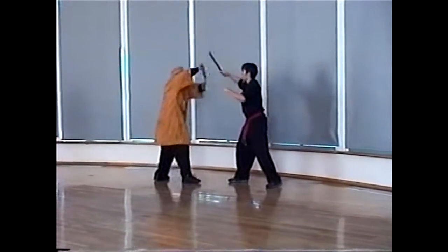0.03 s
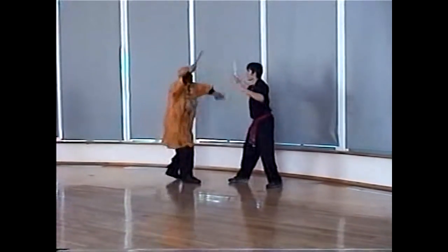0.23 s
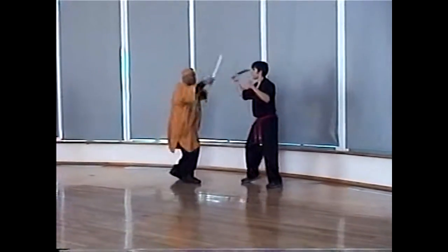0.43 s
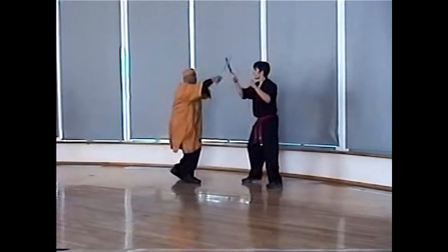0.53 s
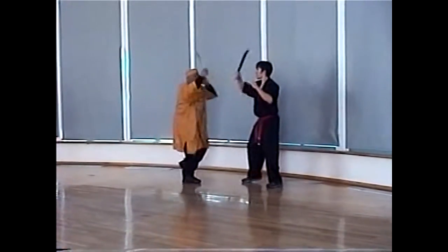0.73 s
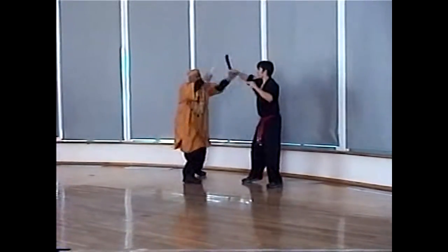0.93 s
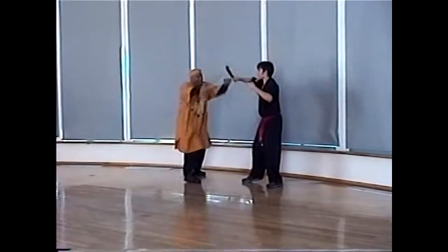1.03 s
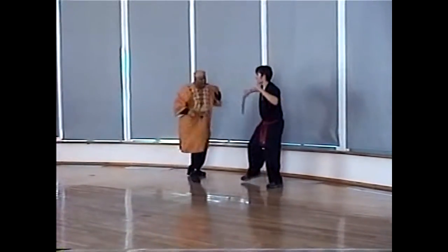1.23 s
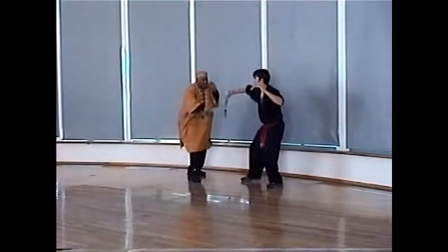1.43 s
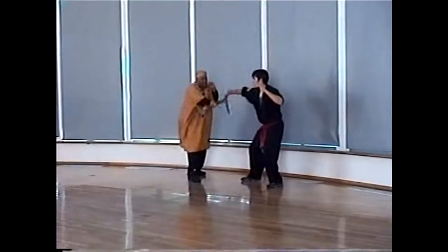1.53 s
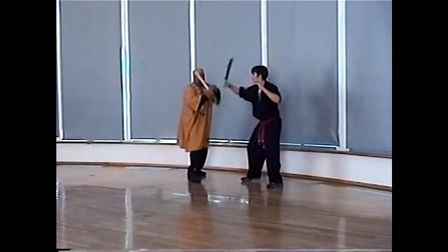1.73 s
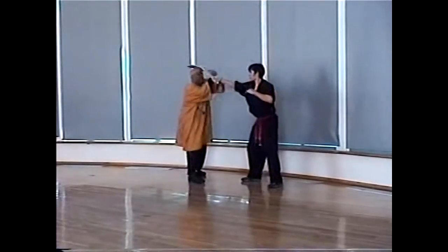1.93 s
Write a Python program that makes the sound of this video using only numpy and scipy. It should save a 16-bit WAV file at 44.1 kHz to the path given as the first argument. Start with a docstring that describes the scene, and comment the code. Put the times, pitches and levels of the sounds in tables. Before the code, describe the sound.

Machete blades strike together in four quick, evenly spaced clacks that ring on and echo around a large hall. A nearby microphone also catches feet softly thudding and scuffing on wooden boards over a low room rumble.

```python
"""Two people spar with machetes in a large hall with a wooden floor and a curved wall.
We open on low room rumble and the ring-out of a clash just gone; feet thud softly on the boards.
From 0.2 s come four clashes, a little under half a second apart, each a short chatter of steel on steel.
After each hit the wall throws it back into a long tail and both blades ring on, smeared in pitch
as they swing. Two last footfalls land under the final decay."""
import sys
import numpy as np
from scipy import signal
from scipy.fft import rfft, irfft
from scipy.io import wavfile
from scipy.ndimage import uniform_filter1d

SR = 44100
rng = np.random.default_rng(int(sys.argv[2]) if len(sys.argv) > 2 else 0)


def waveform_to_disk(signal):
    """Save audio, clipped to [-1, 1], as 16-bit WAV at the path in sys.argv[1]."""
    frames = np.transpose(np.atleast_2d(signal))
    scaled = np.clip(frames, -1, 1) * 32767
    samples = np.round(scaled).astype(np.int16)
    wavfile.write(sys.argv[1], SR, samples)


N = 88200

# Room rumble EQ: f/Hz, level/dB
RUMBLE_EQ = [(20, -4.5), (45, -7.5), (70, -0.5), (100, -7.5), (130, 2.5), (170, -5), (260, -5),
             (420, -12.5), (1000, -20.5), (3000, -25.5), (7000, -30), (11000, -43), (16000, -43.5)]
# Clash cues: t/s, chatter/dB, contact length/s, tilt/(dB per octave), knock/dB, reverb trim/dB, clang/dB,
# clang focus/Hz, crack/dB, bending hum/dB, first blade/dB, its swell/s, second blade/dB, its swell/s
CLASHES = [(-.22, -27, 0.012, -2.5, -20, 1, -23.5, 6500, -35, -55.5, -32, 0.083, -38.5, 0.095),
           (0.2063, -25.5, .013, 1.1, -33, 2.53, -19.5, 5400, -31, -60, -23.5, 0.16, -29.5, 0.024),
           (0.6453, -27, 0.021, 0.4, -29.5, 0.5, -23, 6800, -23, -51.5, -28.5, 0.09, -23.5, 0.065),
           (1.073, -26.5, 0.014, 0.8, -26, 3, -30, 8400, -27, -46.5, -25, 0.075, -34, 0.091),
           (1.5527, -25.5, 0.021, 0, -29.5, -3, -21, 3100, -26.5, -53.5, -37, 0.036, -40.5, .02)]
# Short modes of the blades in contact: f/Hz, level/dB, T60/s
CLANG_MODES = [(896, -18, .08), (1402, -12, 0.1), (1608, -20, 0.047), (2857, -17, 0.035),
               (3080, -11, 0.098), (3468, -19, 0.1), (4526, -19, .2), (6517, -15, 0.11), (6990, -17, 0.12),
               (7330, -17, 0.22), (7810, -14, .15), (8130, -6, 0.12), (8420, -12.5, 0.17),
               (8900, -28.5, 0.051), (10270, -19, .08), (14000, -22, 0.22), (15230, -27, .2)]
# EQs of the steel chatter, the edge crack and the handle knock: f/Hz, level/dB
CHATTER_EQ = [(100, -7), (500, -5), (900, -5), (1200, -6.5), (3000, -3), (4800, -4), (7000, -2.5),
              (9200, -1.5), (11000, -2.5), (13500, -15), (16000, -24)]
CRACK_EQ = [(100, -2), (900, 1.5), (1500, 0.5), (3200, -1.5), (5000, -21), (12000, -23)]
KNOCK_EQ = [(30, -3), (130, 0), (300, -3), (500, -1), (850, -4.5), (1500, -25.5), (5000, -38)]
# Reverb tail EQ: f/Hz, level/dB
HALL_EQ = [(100, -5), (500, -4), (1000, 0.5), (2000, 1.5), (5000, 2), (7500, 4.5), (9500, 2), (12000, -3),
           (16000, 11)]
# Reverb decay: f/Hz, T60/s
HALL_T60 = [(100, 1.3), (500, 1.07), (1500, 1.61), (3500, 1.44), (6000, 1.23), (8500, 0.82), (11000, 0.6),
            (16000, 0.15)]
# Returns from the curved wall: delay/s, spread/s, gain added to the tail
WALL_ECHOES = [(0.086, 0.0085, 0.7), (.16, 0.021, 0.39)]
# Low bending modes, then each blade's high ring, main tone first: f/Hz, level/dB, T60/s
BENDING_MODES = [(1800, 2, 1.0), (829, 1, 1), (1440, -11, 0.63), (3370, -6, 0.83)]
FIRST_BLADE_MODES = [(5418, 0, 1.1), (8446, -18, .6), (15250, -32, .35)]
SECOND_BLADE_MODES = [(6025, -0.5, 1.054), (6400, -10, 0.85), (8550, -22, 0.34), (14150, -35, .45)]
# Footfall cues: t/s, thud/dB, thud pitch/Hz, scuff/dB
STEPS = [(0.086, -31.5, 125, -32.5), (0.134, -51, 160, -60), (.29, -38.5, 133, -66),
         (.352, -34.5, 220, -31.5), (.42, -42, 190, -62), (.49, -44.5, 148, -65), (.73, -40, 144, -54),
         (1.298, -45, 134, -68), (1.688, -45, 130, -53), (1.901, -42.5, 236, -49)]
# EQs of a sole's thud and scuff on wood: f/Hz, level/dB
THUD_EQ = [(30, -29), (130, -11.5), (240, -2.5), (340, -9.5), (500, -0.5), (700, -35), (1500, -40),
           (6000, -67)]
SCUFF_EQ = [(200, -5), (850, 5.5), (1500, -8.5), (3200, -2), (7000, -10), (12000, -33)]
# Lean of the microphone pair: f/Hz, left minus right/dB
BALANCE = [(60, 6), (200, 5.97), (450, 4.46), (750, 2.04), (1200, 3.7), (2000, 6.95), (3400, 7), (4700, 9),
           (5400, 11.5), (6030, 15), (7200, 7), (9000, 4.3), (15000, 2)]
# Feed of the left signal into the right side: f/Hz, gain (0-1)
LIKENESS = [(100, .999), (500, 1), (1000, 0.99), (2000, 0.57), (5500, 1), (8000, 0.93), (14000, 0.93)]

RUMBLE_DB, HUM_HZ, HUM_DB, WHINE_HZ, WHINE_DB = -46.5, 129.8, -57, 15735, -80
TICKS_PER_S, TICK_SPREAD_DB, BITE_S, RELEASE_S = 12000, 4.5, 0.0032, 0.0049
RIDGE_DB, RIDGE_WIDTH_HZ, CLANG_DB_PER_OCTAVE = 5, 70, 7
HALL_BUILD_S, HALL_START_GAIN, CLASH_SEND_DB, STEP_SEND_DB = 0.064, 0.12, 2, -1
SWING_M_PER_S, SOUND_M_PER_S, SWING_HZ, SWAY_DEPTH = 2.0, 343, 1.2, 0.3087
DIRECT_SHARE, CLEAN_S = 0.63, 0.17
SWELL_POWER, BEND_SWELL_S, MODE_ATTACK_S = 0.91, 0.072, 0.0063
THUD_BOOST_DB, THUD_WIDTH_OCTAVES = 16.5, 0.16
RIGHT_LATE_S, MIC_DB, CEILING, LOWPASS_HZ = 0.091e-3, -2, 0.35, 16000


def amp(db):
    return 10 ** (np.asarray(db) / 20)


def read(points, hz):
    """Reads a curve on a log-frequency axis."""
    f, value = np.transpose(points)
    return np.interp(np.log(hz + 1), np.log(f + 1), value)


def add(mix, s, sound):
    """Mixes a sound in at time s; a negative time cuts off its head."""
    at = round(s * SR)
    sound = sound[:, max(-at, 0):]
    part = mix[:, max(at, 0):][:, :sound.shape[1]]
    part += sound[:, :part.shape[1]]


def coloured(x, eq):
    """Applies an EQ and brings each channel to rms 1."""
    hz = np.fft.rfftfreq(x.shape[1], 1 / SR)
    x = irfft(rfft(x) * amp(read(eq, hz)), x.shape[1])
    return x / np.sqrt(np.mean(x ** 2, -1, keepdims=True) + 1e-20)


def burst(eq, decay_s, attack_s=0.0018):
    """A noise hit with a fast attack and a quick decay."""
    t = np.arange(SR // 2) / SR
    envelope = np.minimum(t / attack_s, 1) * np.exp(-t / decay_s)
    return coloured(rng.standard_normal((2, len(t))), eq) * envelope


def room_tone():
    """The bed: low hall rumble with a faint hum and a thin electronic whine."""
    t = np.arange(N) / SR
    hum = amp(HUM_DB) * np.sin(2 * np.pi * HUM_HZ * t)
    whine = amp(WHINE_DB) * np.sin(2 * np.pi * WHINE_HZ * t)
    rumble = amp(RUMBLE_DB) * coloured(rng.standard_normal((2, N)), RUMBLE_EQ)
    return rumble + np.sqrt(2) * (hum + whine)


def clash(chatter_db, contact_s, tilt_db, knock_db, clang_db, focus_hz, crack_db):
    """Edges crack together, chatter through the steel's resonances, clang and knock the handles."""
    t = np.arange(SR // 2) / SR
    size = (2, len(t))
    ticks = (rng.random(size) < TICKS_PER_S / SR) * rng.choice([-1, 1], size)
    ticks = ticks * amp(TICK_SPREAD_DB * rng.standard_normal(size))
    # Narrow EQ ridges at the clang modes make chatter and crack metallic.
    hz = np.fft.rfftfreq(len(t), 1 / SR)[1:]
    peaks = [1 / (1 + (2 * (hz - mode_hz) / RIDGE_WIDTH_HZ) ** 2) for mode_hz, _, _ in CLANG_MODES]
    ridges = RIDGE_DB * np.max(peaks, 0)
    steel_eq = np.transpose([hz, read(CHATTER_EQ, hz) + tilt_db * np.log2(hz) + ridges])
    envelope = np.minimum(t / BITE_S, 1) * np.exp(-np.maximum(t - contact_s, 0) / RELEASE_S)
    chatter = coloured(ticks, steel_eq) * envelope
    crack = burst(np.transpose([hz, read(CRACK_EQ, hz) + ridges]), decay_s=0.0039)
    clang = 0
    for mode_hz, level, t60 in CLANG_MODES:
        rolloff_db = CLANG_DB_PER_OCTAVE * abs(np.log2(mode_hz / focus_hz))
        tone = np.sin(2 * np.pi * (mode_hz * t + rng.random((2, 1))))
        clang += amp(level - rolloff_db - 60 * t / t60) * tone
    knock = burst(KNOCK_EQ, decay_s=0.0072)
    return amp(chatter_db) * chatter + amp(crack_db) * crack + amp(clang_db) * clang + amp(knock_db) * knock


def hall(sound, send_db):
    """Adds a diffuse tail in the sound's own colour; it swells on each wall return and dies treble first."""
    power = uniform_filter1d((abs(rfft(sound, SR)) ** 2).mean(0), size=81)  # 1 Hz bins
    hz, frame_s, noise = signal.stft(rng.standard_normal((2, N)), SR, nperseg=1024)
    colour = np.sqrt(abs(np.interp(hz, np.arange(len(power)), power)))
    decay = amp(read(HALL_EQ, hz)[:, None] - 60 * frame_s / read(HALL_T60, hz)[:, None])
    tail = signal.istft(noise * colour[:, None] * decay, SR, nperseg=1024)[1][:, :N]
    t = np.arange(N) / SR
    build = np.minimum(HALL_START_GAIN + t / HALL_BUILD_S * (1 - HALL_START_GAIN), 1)
    returns = sum(gain * np.exp(-.5 * ((t - delay) / spread) ** 2) for delay, spread, gain in WALL_ECHOES)
    out = amp(send_db) * tail * (build + returns) / np.sqrt(SR / 10)
    add(out, 0, sound)
    return out


def blade_ring(modes, db, swell_s):
    """A freed blade rings: the main tone swells, the rest speak at once; all blur into beating echoes."""
    t = np.arange(SR * 5 // 4) / SR
    direct = DIRECT_SHARE * np.exp(-(t / CLEAN_S) ** 2)
    ring = 0
    for k, (hz, level, t60) in enumerate(modes):
        rise_s = MODE_ATTACK_S if k else swell_s
        wobble = np.sqrt(direct) + np.sqrt(1 - direct) * swing_smear(hz, t)
        tone = (wobble * np.exp(2j * np.pi * (hz * t + rng.random()))).real
        swell = np.minimum(t / rise_s, 1) ** SWELL_POWER
        decay = amp(level - 60 * np.maximum(t - rise_s, 0) / t60)
        ring += swell * decay * tone
    return np.sqrt(2) * amp(db) * ring


def swing_smear(hz, t, paths=24):
    """Complex wobble of a swinging blade's tone arriving by many paths, each with its own Doppler shift."""
    control_t = t[::32]
    rank = (np.arange(paths) + rng.uniform(.1, .9, (2, paths))) / paths
    spread = (np.arcsin(2 * rank - 1) * np.sqrt(2))[..., None]
    sway = SWAY_DEPTH * np.sin(2 * np.pi * (SWING_HZ * control_t + rng.random((2, paths, 1))))
    shift_hz = hz * SWING_M_PER_S / SOUND_M_PER_S * (spread + sway)
    cycles = np.cumsum(shift_hz, -1) * control_t[1] + rng.random((2, paths, 1))
    wobble = np.exp(2j * np.pi * cycles).sum(1)
    wobble /= np.sqrt(uniform_filter1d(abs(wobble) ** 2, size=110))  # evens the level over 80 ms
    return np.array([np.interp(t, control_t, side) for side in wobble])


def footfall(thud_db, thud_hz, scuff_db):
    """A sole thuds on the boards and scuffs."""
    hz = np.geomspace(20, SR / 2, num=100)
    boost = THUD_BOOST_DB * np.exp(-.5 * (np.log2(hz / thud_hz) / THUD_WIDTH_OCTAVES) ** 2)
    thud = burst(np.transpose([hz, read(THUD_EQ, hz) + boost]), decay_s=0.03)
    return amp(thud_db) * thud + amp(scuff_db) * burst(SCUFF_EQ, decay_s=0.0061)


def scene():
    """Lays clashes, ringing blades and footfalls over the room tone."""
    mix = room_tone()
    for (s, chatter_db, contact_s, tilt_db, knock_db, trim_db, clang_db, focus_hz, crack_db,
         bend_db, first_db, first_swell_s, second_db, second_swell_s) in CLASHES:
        hit = clash(chatter_db, contact_s, tilt_db, knock_db, clang_db, focus_hz, crack_db)
        add(mix, s, hall(hit, CLASH_SEND_DB + trim_db))
        add(mix, s, blade_ring(BENDING_MODES, bend_db, BEND_SWELL_S))
        add(mix, s, blade_ring(FIRST_BLADE_MODES, first_db, first_swell_s))
        add(mix, s, blade_ring(SECOND_BLADE_MODES, second_db, second_swell_s))
    for s, thud_db, thud_hz, scuff_db in STEPS:
        add(mix, s, hall(footfall(thud_db, thud_hz, scuff_db), STEP_SEND_DB))
    return mix


def record(dry):
    """A close microphone pair, the right inverted, weaker and a touch late; then soft clip and low-pass."""
    hz = np.fft.rfftfreq(N, 1 / SR)
    left, other = rfft(dry)
    likeness = read(LIKENESS, hz)
    right = likeness * left + np.sqrt(1 - likeness ** 2) * other
    right *= -amp(-read(BALANCE, hz)) * np.exp(-2j * np.pi * hz * RIGHT_LATE_S)
    pair = amp(MIC_DB) * irfft(np.array([left, right]), N)
    clipped = pair / (1 + (pair / CEILING) ** 4) ** .25
    lowpass = signal.firwin(255, LOWPASS_HZ, window=("kaiser", 9), fs=SR)
    return signal.oaconvolve(clipped, lowpass[None], "same")


dry = scene()
out = record(dry)
waveform_to_disk(out)
```